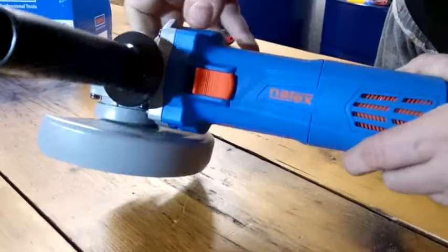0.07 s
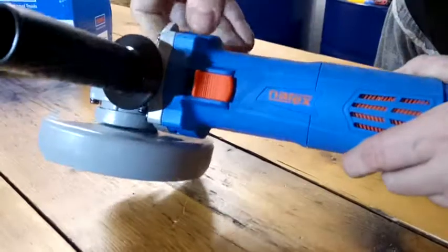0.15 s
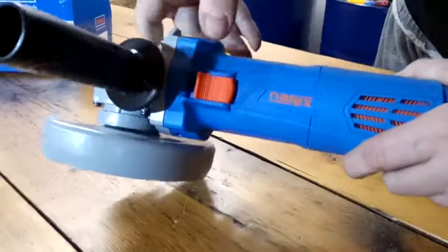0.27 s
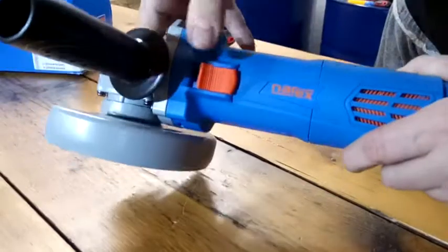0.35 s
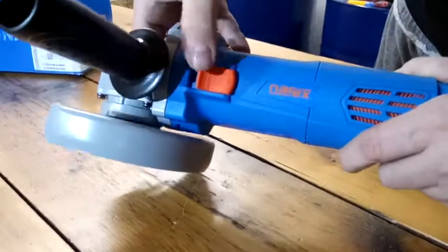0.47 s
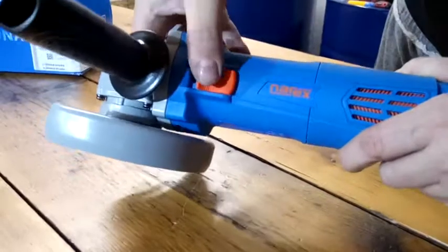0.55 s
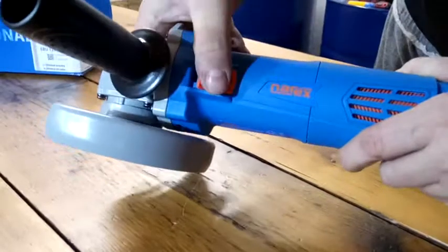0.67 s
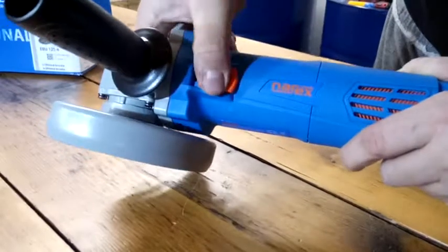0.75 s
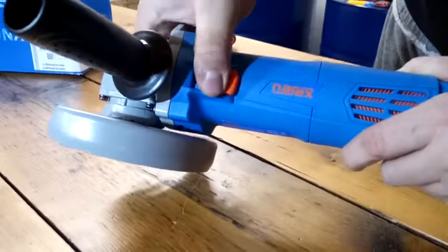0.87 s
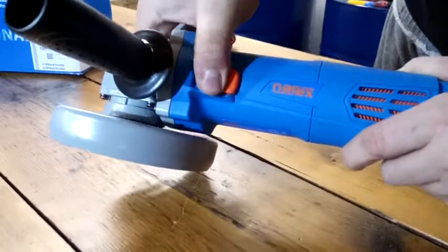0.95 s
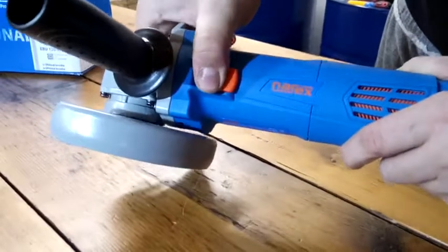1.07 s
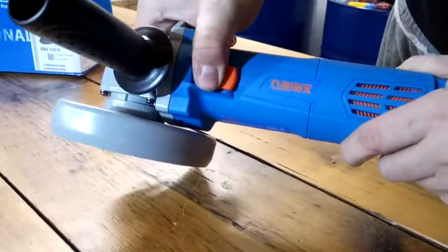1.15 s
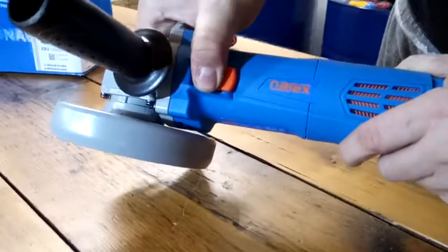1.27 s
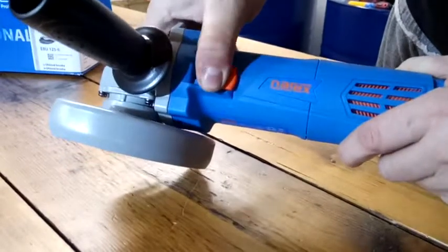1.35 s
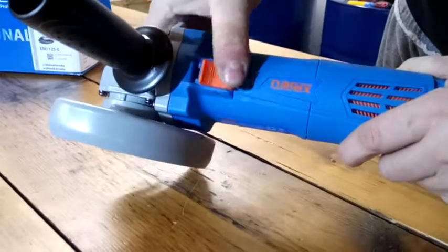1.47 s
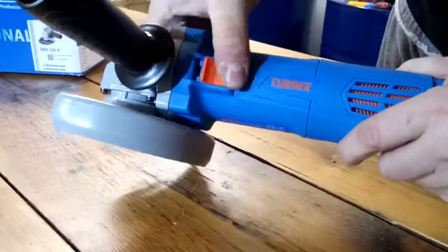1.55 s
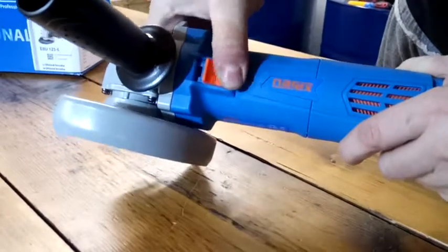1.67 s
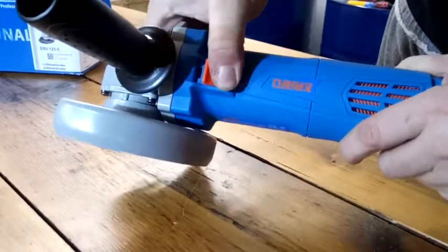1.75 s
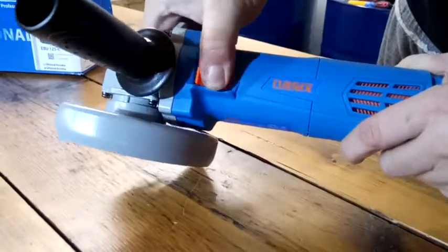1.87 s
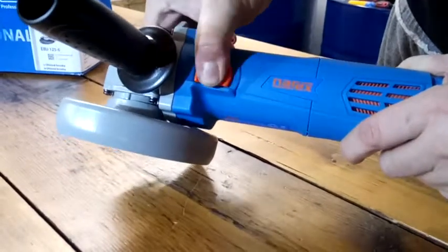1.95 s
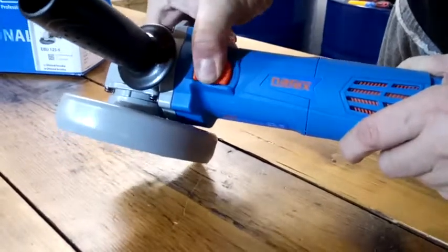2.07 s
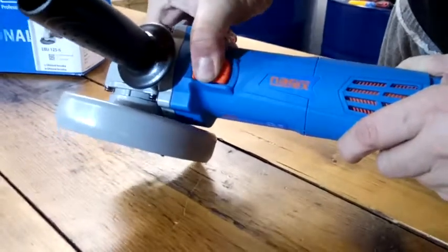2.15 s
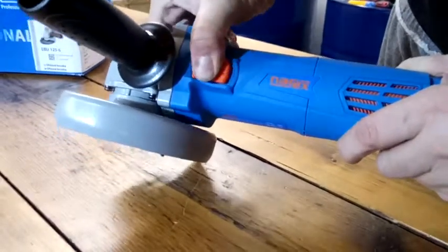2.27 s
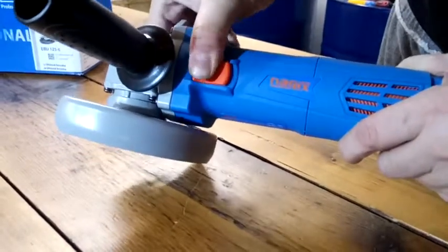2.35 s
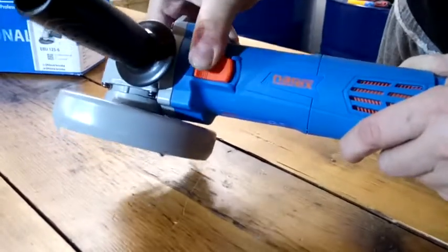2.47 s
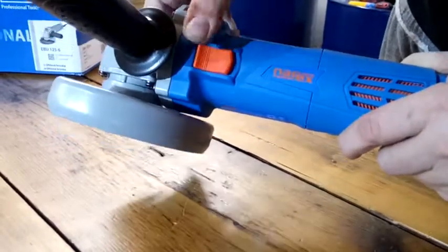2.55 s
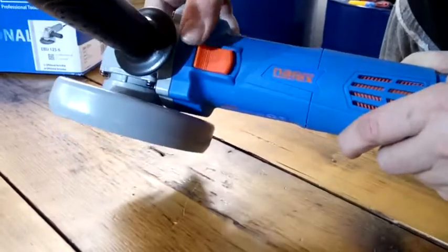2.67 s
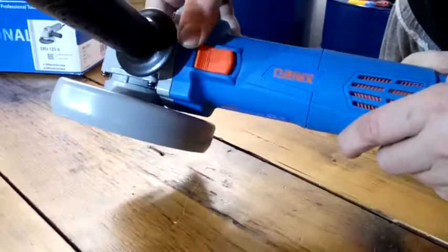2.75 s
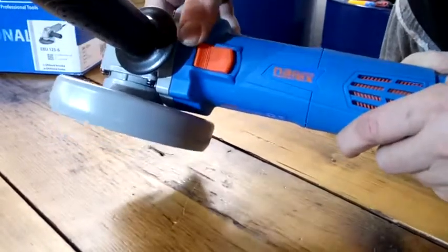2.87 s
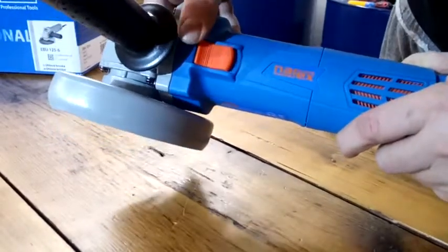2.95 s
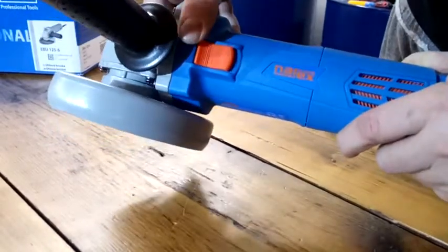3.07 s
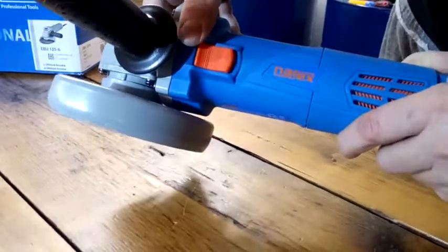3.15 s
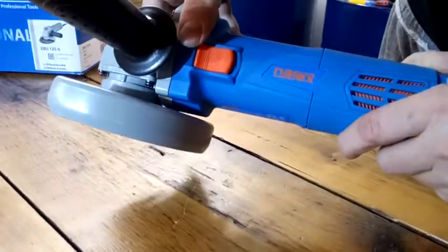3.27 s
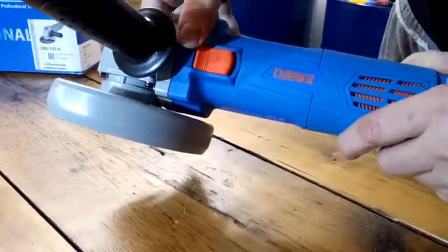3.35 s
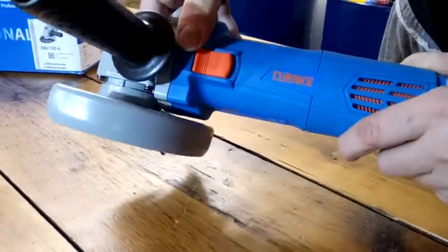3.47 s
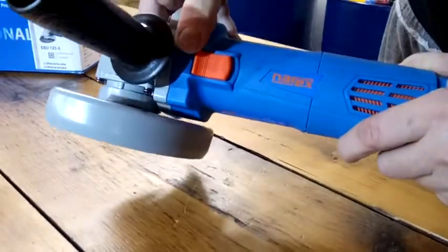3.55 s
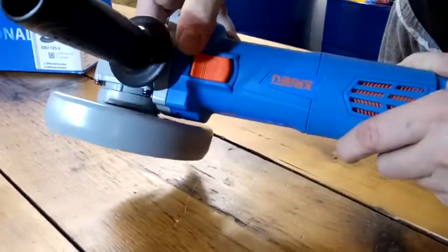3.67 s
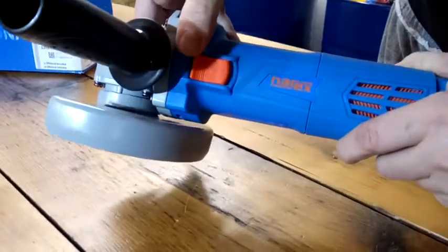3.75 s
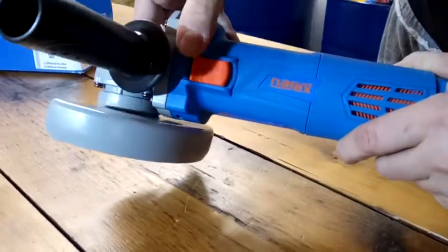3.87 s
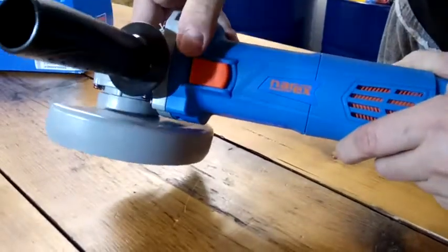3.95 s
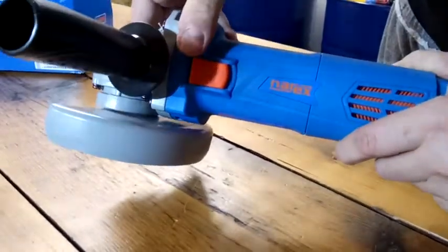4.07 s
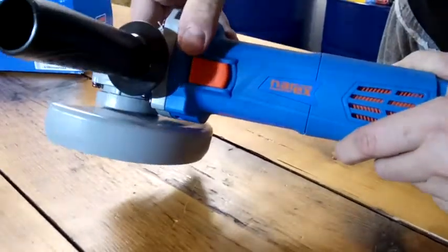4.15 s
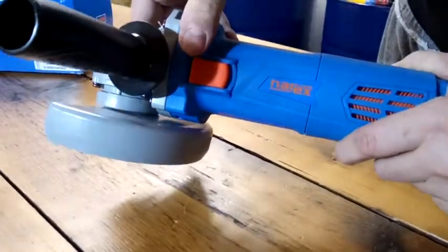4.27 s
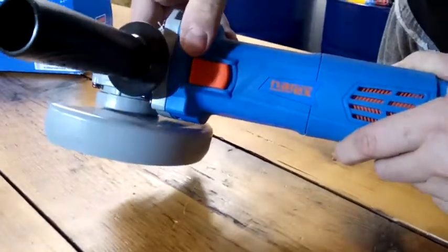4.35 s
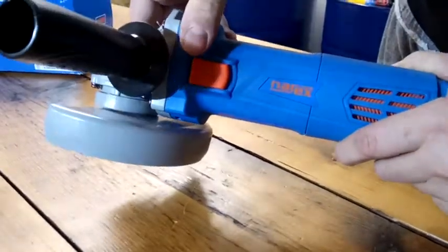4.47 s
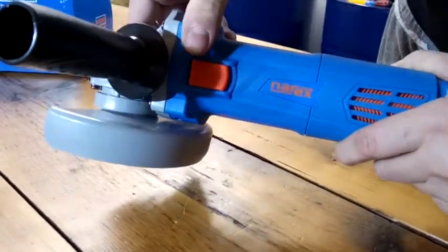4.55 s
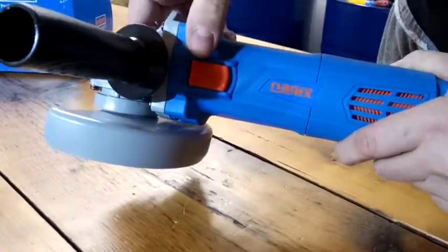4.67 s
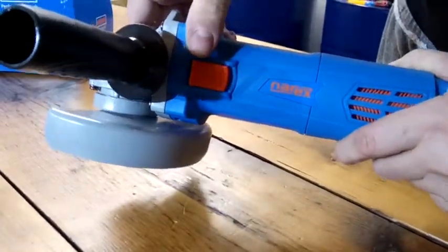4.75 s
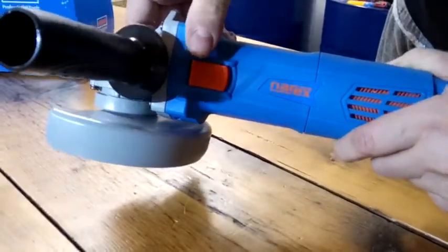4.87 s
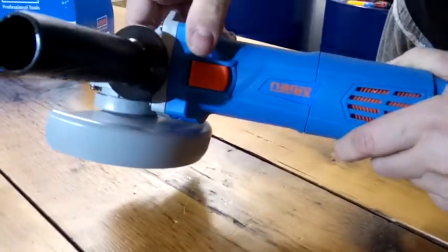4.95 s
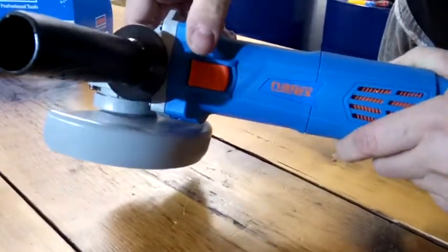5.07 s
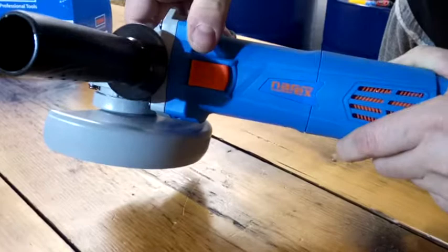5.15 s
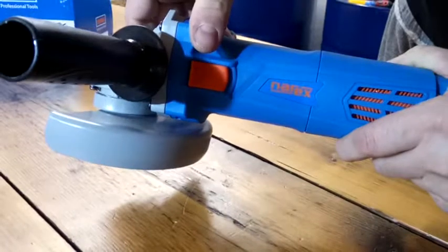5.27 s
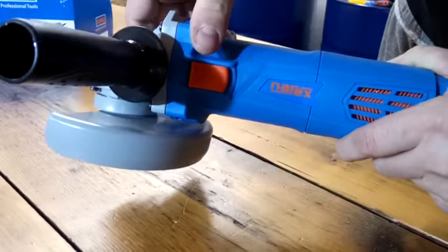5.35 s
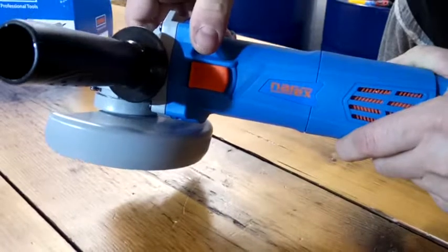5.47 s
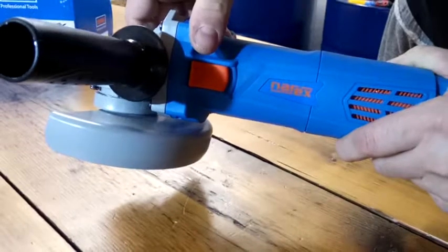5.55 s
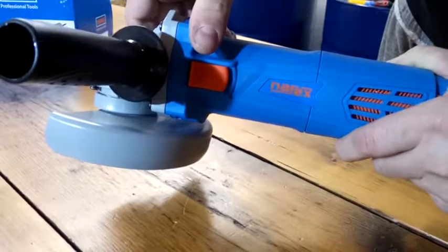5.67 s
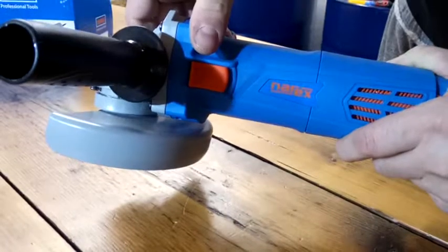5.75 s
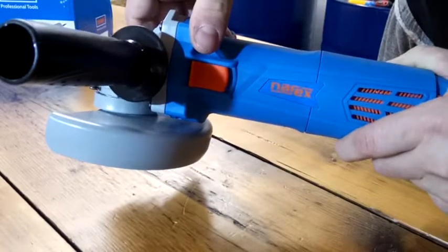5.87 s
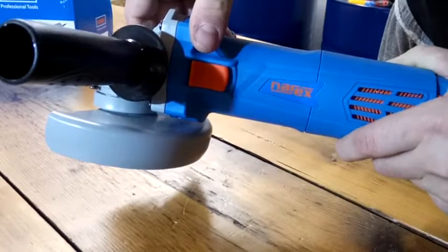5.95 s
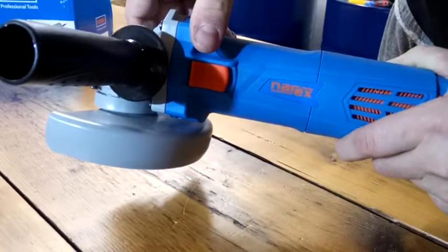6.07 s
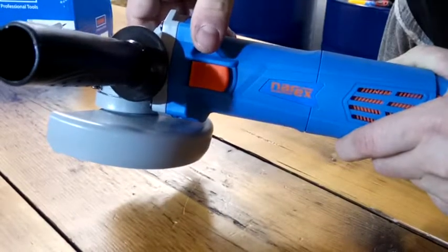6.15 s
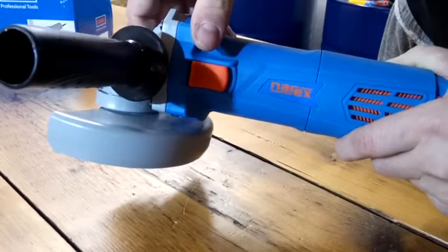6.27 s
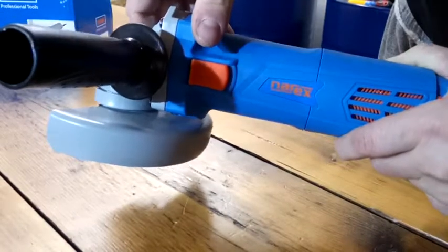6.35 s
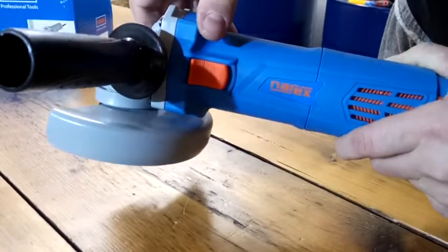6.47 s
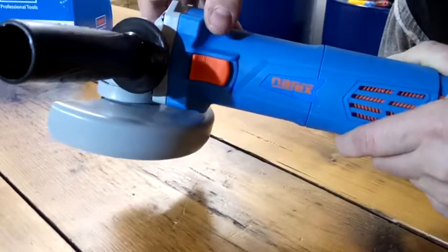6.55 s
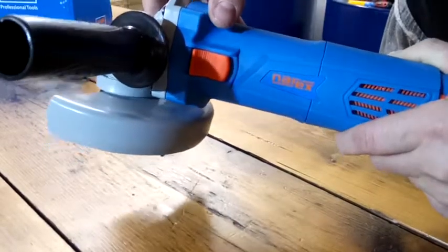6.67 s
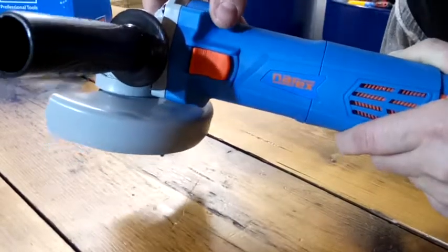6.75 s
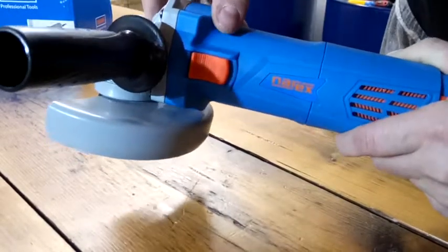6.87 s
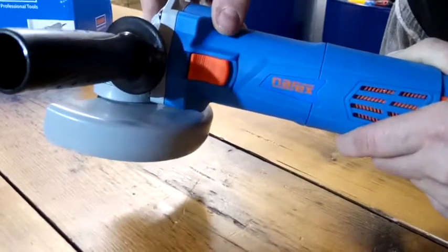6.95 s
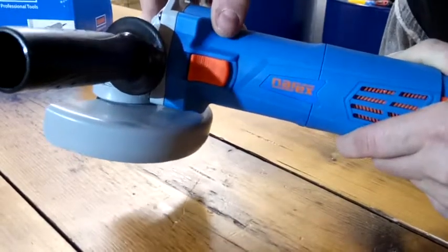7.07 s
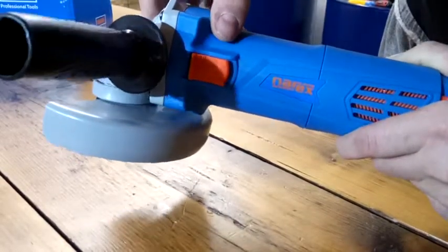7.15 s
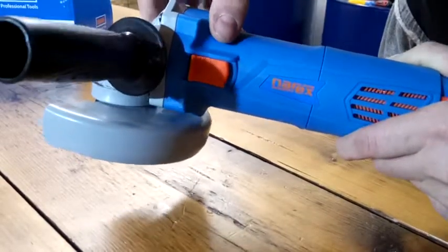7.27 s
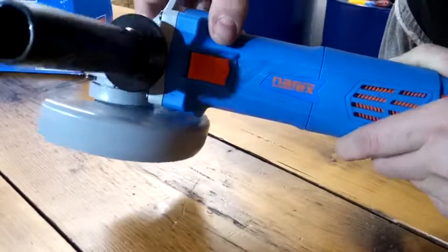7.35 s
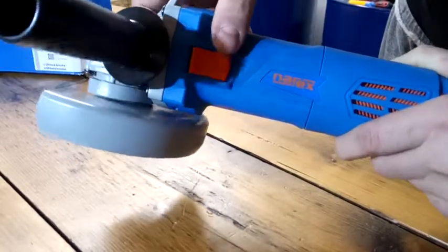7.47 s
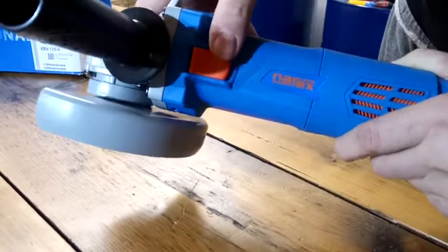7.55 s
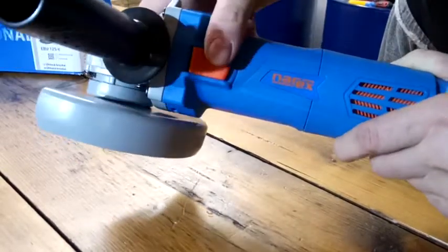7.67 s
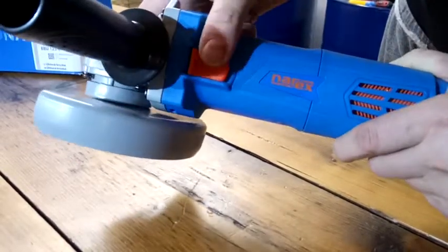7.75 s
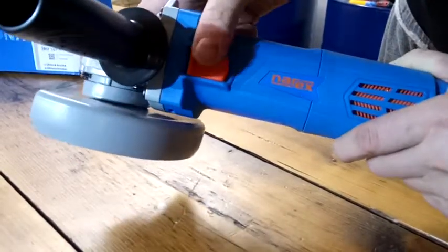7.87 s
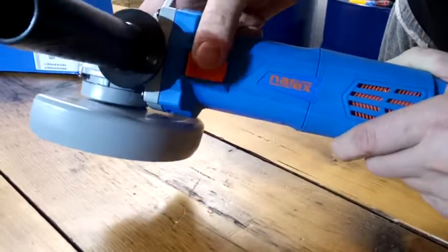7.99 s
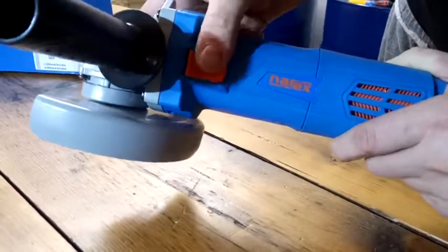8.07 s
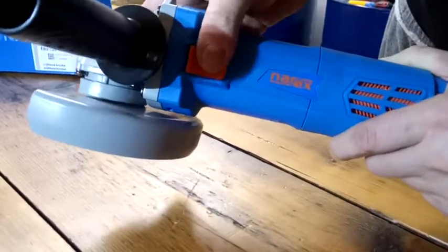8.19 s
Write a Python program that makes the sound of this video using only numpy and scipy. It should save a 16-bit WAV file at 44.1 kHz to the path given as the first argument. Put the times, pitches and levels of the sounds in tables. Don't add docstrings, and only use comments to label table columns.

```python
import sys
import numpy as np
from scipy import signal
from scipy.fft import rfft, irfft, next_fast_len
from scipy.io import wavfile
from scipy.ndimage import uniform_filter1d, map_coordinates

SR = 44100
rng = np.random.default_rng(int(sys.argv[2]) if len(sys.argv) > 2 else 0)


def master(y):
    cut = np.clip(np.atleast_2d(y).T, -1, 1)
    pcm = np.round(cut * 32767)
    wavfile.write(sys.argv[1], SR, pcm.astype(np.int16))


def ratio_of_db(decibels):
    return 10 ** (np.asarray(decibels, float) / 20)


N = 362502
MAINS_HZ = 50
CURRENT_ON_S, STANDSTILL_S = 1.595, 0.8


def seconds():
    return np.arange(N) / SR


def unit(x):
    return x / np.sqrt(np.mean(x ** 2) + 1e-20)


def steady(x, span=4410):
    return x / np.sqrt(np.abs(uniform_filter1d(x ** 2, size=span)) + 1e-12)


def along(points, hz):
    f, v = np.transpose(points)
    return np.interp(np.log(hz + 1), np.log(f + 1), v)


def curves(rows):
    s, *cols = np.transpose(rows)
    return [np.interp(seconds(), s, c) for c in cols]


def gate(start_s, rise_s, end_s, fall_s):
    corners_s = [start_s, start_s + rise_s, end_s, end_s + fall_s]
    return np.interp(seconds(), corners_s, [-60, 0, 0, -60], -200, -200)


def wobble(rate_hz):
    knots = rng.standard_normal(int(N * rate_hz / SR) + 4)
    return map_coordinates(knots, [np.arange(N) * rate_hz / SR])


def filtered(x, response):
    m = next_fast_len(N + SR // 2)
    return irfft(rfft(x, m) * response(np.fft.rfftfreq(m, 1 / SR)), m)[..., :N]


def noise(spectrum):
    return unit(filtered(rng.standard_normal(N), lambda hz: ratio_of_db(along(spectrum, hz))))


def resonance(centre_hz, width_hz, db, f):
    return ratio_of_db(db) * 1j * f * width_hz / (centre_hz ** 2 - f * f + 1j * f * width_hz)


def ringing(modes, f):
    return sum(resonance(*mode, f) for mode in modes)


def dying(t60s):
    hz, t, z = signal.stft(rng.standard_normal(SR // 2), SR, nperseg=256)
    fade = ratio_of_db(-60 * t / along(t60s, hz)[:, None])
    tail = signal.istft(z * fade, SR, nperseg=256)[1][:SR // 2]
    return tail / np.linalg.norm(tail)


def bursts(count, scatter_db, decay_s):
    hit = np.diff(np.floor(count), prepend=np.floor(count[0])) > 0
    size = ratio_of_db(scatter_db * rng.standard_normal(int(np.abs(count).max()) + 2))
    t = np.arange(SR // 40) / SR
    impact = np.exp(-t / decay_s) * (1 - np.exp(-t / 0.0002))
    return signal.fftconvolve(hit * size[np.abs(count).astype(int)], impact)[:N]


def strikes(rows, spectrum, t60_s=None):
    x, t = np.zeros(N + SR), np.arange(SR // 20) / SR
    for s, db, *own_t60 in rows:
        t60 = own_t60[0] if own_t60 else t60_s
        crack = ratio_of_db(db - 60 * t / t60) * (1 - np.exp(-t / 0.0006))
        x[round(s * SR):][:len(t)] += crack * rng.standard_normal(len(t))
    grid_hz = np.linspace(0, SR / 2, 2000)
    norm = np.sqrt(np.mean(ratio_of_db(along(spectrum, grid_hz)) ** 2))
    return filtered(x[:N], lambda hz: ratio_of_db(along(spectrum, hz)) / norm)


# (time [s], speed [turns/s])
ROTOR_SPEED = [(1.6, 40), (1.88, 208), (2.01, 230), (2.06, 280), (2.12, 349), (2.2, 402), (2.291, 448),
               (2.44, 503), (2.64, 545), (2.93, 565), (3.3, 577), (3.5, 581), (4, 586.3), (4.5, 589),
               (5, 590.4), (6, 591.2), (7, 591.6), (8.22, 593.5)]


def rotor():
    return uniform_filter1d(curves(ROTOR_SPEED)[0], size=SR // 12)


def chopper():
    t = seconds()
    delay_ms = np.maximum(5.6 - 10.5 * (t - CURRENT_ON_S), 1.1)
    kick_share = 0.97 * np.clip(1 - (rotor() - 153) / 365, 0, 1)
    return 2 * MAINS_HZ * (t - delay_ms / 1000), kick_share


def speed_left():
    return np.clip(1 - (seconds() / STANDSTILL_S) ** 2, 1e-3, 1)


def tooth_force(coasting):
    knocks_per_s, loose_share, same_kick = 155, 0.67, 0.3
    t = seconds()
    fired, kick_share = chopper()
    kicks = bursts(fired, scatter_db=1.5, decay_s=0.0015)
    loose_count = np.cumsum(knocks_per_s * speed_left()) / SR + 0.21 * wobble(60)
    loose = bursts(loose_count, scatter_db=1.5, decay_s=0.0012)
    grit_count = np.cumsum(np.full(N, 700 / SR)) + 0.45 * wobble(300)
    grit = bursts(grit_count, scatter_db=-7.5, decay_s=0.0018)
    share = np.clip(np.where(coasting, loose_share * (t < 0.66), kick_share), 0, 1)
    pulse = np.sqrt(share) * steady(np.where(coasting, loose, kicks))
    pulse += np.sqrt(1 - share) * (1.83 + 0.21 * unit(grit))
    same = np.clip(same_kick * share ** 2 * ~coasting, 0, 1)
    again = rng.standard_normal(SR // 100 + 1)[(fired % 1 * (SR // 100)).astype(int)]
    return steady(pulse) * (np.sqrt(1 - same) * rng.standard_normal(N) + np.sqrt(same) * again)


# (time [s], level [dB])
EFFORT = [(1.6, -33.5), (1.67, -23), (1.8, -20), (1.84, -23), (1.97, -17.5), (2.1, -19.5), (2.28, -18),
          (3.26, -16), (4.49, -17), (6.37, -16), (6.98, -17.5), (8.2, -15.5), (8.22, -13.5)]
# (frequency [Hz], density [dB/Hz])
COAST_COLOUR = [(59, -47), (100, -11), (160, -22.5), (386, -31), (562, -11), (745, -17.5), (969, -11.5),
                (2260, -13), (2670, -1), (3740, -7.5), (5150, -10.5), (6330, -9.5), (8880, -42.5),
                (11500, -91), (19500, -120)]
# (frequency [Hz], density [dB/Hz])
KICK_COLOUR = [(240, -14), (400, -12), (546, -6), (606, -17), (717, -4), (795, -14), (1070, -2.5),
               (1600, -12), (2250, -9), (2800, -0.5), (3490, -1.5), (3820, -9), (6500, -1), (8880, -49.5),
               (11500, -82), (19500, -120)]
# (frequency [Hz], density [dB/Hz])
SPEED_COLOUR = [(35, -74.5), (60, -49.5), (125, -36), (190, -25), (420, -18), (650, -12), (1000, -11.5),
                (1630, -5.5), (2040, -10.5), (2600, -2), (4060, -3.5), (5960, 2.5), (6730, -5), (7600, -22),
                (9880, -55.5)]
# (frequency [Hz], width [Hz], level [dB])
GEAR_HEAD = [(2650, 340, -3.5), (3120, 44, 0.5), (3365, 90, 4), (4900, 71, -1.5), (5230, 390, -3.5),
             (6200, 60, -3.5), (6120, 66, -5)]
# (frequency [Hz], width [Hz], level [dB])
GUARD_MODES = [(970, 180, -1), (1850, 370, -8.5), (2655, 120, -10), (3390, 110, -9), (4420, 330, -6),
               (5110, 110, -8.5), (5490, 270, -18.5), (8200, 700, 2.5)]
# (low edge [Hz], high edge [Hz])
PART_BANDS = [
    (2300, 4000),
    (4000, 11000),
    (500, 2300),
    (20, 500),
]
# (first level [dB], fade [dB/s], power of speed left [1])
PART_COASTING = [(-32, 0.5, 2.9), (-28.5, 43.5, .55), (-41, 17, 1.3), (-50.5, 2, 2.5)]
# (kicked [dB], at speed [dB], teeth taking load [dB], tool tilted [dB])
PART_RUNNING = [(-7.5, -5.5, 0, 1), (-4.5, -2, 0.4, -1.2), (-10, -12.5, -8, -1.6), (-22.5, -29, -7, .6)]


def clatter():
    t = seconds()
    coasting = t < 1.2
    force = tooth_force(coasting)
    slow = unit(filtered(force * coasting,
                         lambda hz: ratio_of_db(along(COAST_COLOUR, hz)) * (1 + 2 * ringing(GEAR_HEAD, hz))))
    start = unit(filtered(force, lambda hz: ratio_of_db(along(KICK_COLOUR, hz)) * (1 + 0.77 * ringing(GEAR_HEAD, hz))))
    fast = filtered(force, lambda hz: ratio_of_db(along(SPEED_COLOUR, hz)) * (1 + ringing(GUARD_MODES, hz)))
    blend = np.clip((rotor() - 200) / 300, 0, 1)
    effort_db, = curves(EFFORT)
    tilt = np.clip((t - 6.55) / 1.4, 0, 1)
    load = np.exp(-((t - 1.99) / 0.1) ** 2 / 2)
    current_in = np.clip((t - CURRENT_ON_S) / 0.038, 0, 1)
    left = speed_left()
    out = np.zeros(N)
    for (lo, hi), coast_row, run_row in zip(PART_BANDS, PART_COASTING, PART_RUNNING):
        first_db, fade, power = coast_row
        kick_db, fast_db, load_db, tilt_db = run_row
        band = lambda hz: (hz >= lo) & (hz < hi)
        coast = ratio_of_db(first_db - fade * t) * left ** power * (t < STANDSTILL_S + 0.1)
        run_db = effort_db + (1 - blend) * kick_db + blend * fast_db + load_db * load + tilt_db * tilt
        run = ratio_of_db(run_db) * current_in
        coast_sound = np.sqrt(coasting.mean()) * unit(filtered(slow, band))
        low = np.where(coasting, coast_sound, unit(filtered(start, band)))
        mix = (1 - blend) * low + blend * unit(filtered(fast, band))
        mix /= np.sqrt(np.mean(mix[N // 2:] ** 2))
        unsteady = ratio_of_db(0.27 * wobble(7) + 0.47 * wobble(30) + 0.5 * wobble(2.592))
        out += (coast + run) * unsteady * mix
    return out


# (frequency [Hz], level [dB])
SLOT_LEVEL = [(2100, -79), (2700, -30.5), (3500, -40.5), (4200, -29), (4900, -31.5), (5600, -26),
              (6550, -30.5), (7050, -53)]
# (frequency [Hz], level [dB])
BAR_LEVEL = [(4600, -63), (5000, -40.5), (5350, -33), (5900, -33.5), (6600, -44), (7500, -73)]
# (frequency [Hz], width [Hz], level [dB])
CASTING_WALL = [(3360, 160, 0)]
# (multiple of rotor speed [1], level at full speed [dB])
WEAK_ORDERS = [(.2725, -61.5), (2.667, -48.5), (3.74, -49.5), (4.265, -38.5), (5.075, -36.5), (8, -48),
               (9, -42.5), (10, -43.5), (11, -37.5), (12, -48), (13, -60), (14.07, -70.5)]
# (frequency [Hz], width [Hz], level [dB])
SHELL_MODE = [(545.6, 61, 7.5)]


def whine():
    speed, (fired, kick_share), t = rotor(), chopper(), seconds()
    angle = 2 * np.pi * np.cumsum(speed) / SR
    pull = 1 + 1.5 * kick_share * np.sin(2 * np.pi * fired)

    def tone(order, db, rough, rate_hz):
        level = np.sqrt(2) * ratio_of_db(db + 4.4 * np.minimum(rough, 1) * wobble(rate_hz))
        return level * np.sin(order * angle + rough * wobble(rate_hz))

    looseness = 0.22 + 2.6 * kick_share ** 1.2
    slots = pull * tone(12, along(SLOT_LEVEL, 12 * speed), looseness, 120)
    bars = pull * tone(24, along(BAR_LEVEL, 24 * speed), 1.7, 300)
    bars = filtered(bars, lambda hz: 1 + ringing(GEAR_HEAD, hz))
    loaded = ratio_of_db(-27.5) * np.exp(-((t - 2.14) / 0.09) ** 2 / 2)
    wall = unit(filtered(rng.standard_normal(N), lambda hz: ringing(CASTING_WALL, hz) ** 2))
    mesh = loaded * pull * wall
    settled_db = 60 * np.log10(speed / speed[-1])
    lines = sum(tone(k, db + settled_db, 0.35 + 0.038 * k, 15) for k, db in WEAK_ORDERS)
    swing = (speed / speed[-1]) ** 3.4 * np.abs(1 + ringing(SHELL_MODE, speed))
    imbalance = swing * tone(1, -42, 0.1, 30)
    return (imbalance + slots + bars + mesh + lines) * (t > CURRENT_ON_S)


# (time [s], peak [dB])
KICK_JOLTS = [(1.5954, -18.5), (1.615, -18.5), (1.705, -5.5), (1.8145, -4.5), (1.8696, -9), (1.9119, -8),
              (2.004, -11.5), (2.0411, -14.5)]


def jolts():
    return ratio_of_db(-7.5) * strikes(KICK_JOLTS, KICK_COLOUR, t60_s=0.016)


# (time [s], peak [dB])
BACKLASH_KNOCKS = [(0.1004, -14.5), (0.1696, -16.5), (0.22, -14.5), (0.246, -19), (0.2878, -19.5),
                   (0.3202, -22), (0.3365, -21), (0.3674, -19.5), (0.3954, -29.5), (0.414, -27.5),
                   (0.4399, -24), (0.4613, -34), (0.48, -28), (0.4913, -28.5), (0.5053, -29), (0.5687, -38)]
# (time [s], peak [dB], t60 [s])
GEAR_SETTLING = [(0.734, -30, 0.018), (0.853, -66, 0.016)]
# (frequency [Hz], density [dB/Hz])
DROP_COLOUR = [(180, -77), (300, -45), (964, -9), (2170, -31), (2420, -11), (3370, -7), (3860, -22),
               (8000, -52), (10400, -77), (17600, -120)]


def knocks():
    backlash = ratio_of_db(-6) * strikes(BACKLASH_KNOCKS, COAST_COLOUR, t60_s=0.018)
    return backlash + ratio_of_db(-4) * strikes(GEAR_SETTLING, DROP_COLOUR)


# (frequency [Hz], level [dB], unsteadiness [dB])
HUM_LINES = [(50, -25, 3), (100.5, -6, 1.5), (200, -4.5, 0.5), (308, -8.5, 6.5), (503, -17, 3),
             (700, -20, 3)]


def hum():
    t, lift_s = seconds(), 1.98
    level = ratio_of_db(-38 + gate(CURRENT_ON_S - 0.03, 0.055, lift_s, 0.05))
    return level * sum(ratio_of_db(db + depth_db * wobble(22)) * np.sin(2 * np.pi * hz * t)
                       for hz, db, depth_db in HUM_LINES)


# (time [s], peak [dB], t60 [s])
SWITCH_CLICKS = [
    (1.41, -60, 0.014),
    (1.476, -12.5, 0.017),
    (1.509, -46, 0.012),
]
# (frequency [Hz], density [dB/Hz])
SNAP_COLOUR = [(180, -66), (300, -47), (906, -15.5), (2090, -14), (3790, -4.5), (6140, -4.5), (8880, -20.5),
               (11500, -54), (19500, -120)]
# (frequency [Hz], density [dB/Hz])
SKIN_COLOUR = [(3000, -40.5), (4300, -20), (5200, 0), (6400, -3), (7400, -5.5), (8000, -21), (8800, -21),
               (9500, -60.5)]
# (frequency [Hz], density [dB/Hz])
SLIDE_COLOUR = [(300, -4), (600, 11), (900, -5), (1500, -20), (3400, -17), (4300, -16), (6500, -21),
                (7500, -23), (8800, -41), (9500, -88)]
# (time [s], peak [dB], t60 [s])
FINGERTIPS = [(.898, -54, .012), (1.0195, -42.5, 0.019), (1.2145, -54, 0.011)]


def thumb():
    rub_s, slide_s, slide_end_s = 1.079, 1.49, 1.6
    rub_db = -60.5 - 200 * (seconds() - rub_s) + gate(rub_s - 0.008, 0.008, rub_s + 0.1, 0.05)
    slide_db = -53.5 + gate(slide_s - 0.015, 0.01, slide_end_s, 0.05)
    clicks = ratio_of_db(-4.5) * strikes(SWITCH_CLICKS, SNAP_COLOUR)
    rubs = ratio_of_db(rub_db) * noise(SKIN_COLOUR) + ratio_of_db(slide_db) * noise(SLIDE_COLOUR)
    return clicks + rubs + strikes(FINGERTIPS, KICK_COLOUR)


# (time [s], peak [dB])
HAND_BUMPS = [(0.152, -25), (0.344, -23.5), (0.52, -38.5), (0.904, -24), (1.219, -27.5), (1.502, -37)]
# (frequency [Hz], level [dB], t60 [s])
TABLE_MODES = [(72.6, 2.5, 0.19), (129.6, -4, 0.24), (222.6, -11.5, 0.35), (255, -19, 0.25),
               (322.6, -11.5, 0.34), (550, -29, 1.3), (689, -12.5, 0.3)]
# (frequency [Hz], width [Hz], level [dB])
BOARD_MODES = [(214, 92, -4), (356, 67, -0.5), (567, 47, -11), (704, 59, -9.5), (1070, 62, -10),
               (1440, 140, -14), (2630, 190, -22.5), (3280, 220, -16.5), (5080, 170, -21),
               (6370, 330, -39.5)]
# (frequency [Hz], t60 [s])
BOARD_DECAY = [(200, 0.54), (700, 0.34), (1500, .2), (3000, 0.14), (6000, 0.31)]


def table():
    x, body, t = np.zeros(N + SR), np.zeros(N + SR), np.arange(SR // 2) / SR
    for s, db in HAND_BUMPS:
        for late_s, part_db in [(0, -5), (0.015, -11.5)]:
            ring = sum(ratio_of_db(level + rng.normal(0, 4.1) - 60 * t / (0.59 * t60)) * np.sin(2 * np.pi * hz * t)
                       for hz, level, t60 in TABLE_MODES)
            x[round((s + late_s) * SR):][:len(t)] += ratio_of_db(db + part_db) * ring * (1 - np.exp(-t / 0.002))
        rattle = dying(BOARD_DECAY) * (1 + 3 * np.exp(-t / 0.0024))
        body[round(s * SR):][:len(t)] += ratio_of_db(db + 34.5) * rattle

    def boards(hz):
        modes = sum((-1) ** k * resonance(*mode, hz) for k, mode in enumerate(BOARD_MODES))
        return modes * (hz < 7300)

    return x[:N] + filtered(body[:N], boards)


# (frequency [Hz], t60 [s])
ROOM_DECAY = [(100, 0.36), (1000, 0.36), (4000, 0.46), (8000, 0.38)]


def room(x):
    return signal.fftconvolve(np.pad(x, (300, 0)), dying(ROOM_DECAY))[:N]


# (frequency [Hz], density [dB/Hz])
HUSH_COLOUR = [(25, -6.5), (65, -5), (150, -3.5), (300, -15.5), (600, -24.5), (1500, -27), (3300, -30),
               (4500, -27.5), (6300, -29), (7500, -47), (9000, -74.5)]


def hush():
    return ratio_of_db(-65.5) * noise(HUSH_COLOUR)


def scene():
    gears = clatter()
    hits = jolts() + knocks() + thumb() + table()
    echo = room(ratio_of_db(-10) * hits + ratio_of_db(-20) * gears)
    return (gears + whine() + hits + hum() + echo + hush())[None]


# (frequency [Hz], gain [dB])
MIC_RESPONSE = [(20, -7), (40, -4.5), (70, 1.5), (7000, 0), (7600, -2), (8000, -13.5), (8500, -4),
                (8800, -7), (9100, -7.5)]


def microphone(x):
    return filtered(x, lambda hz: ratio_of_db(along(MIC_RESPONSE, hz)) * (hz < 9170))


def top_cut(x):
    return signal.sosfilt(signal.butter(12, 9030, fs=SR, output="sos"), x)


def record(dry):
    limited = dry / (1 + np.abs(dry / 0.52) ** 4) ** (1 / 4)
    heard = microphone(limited)
    return top_cut(heard)


dry = scene()
out = record(dry)
master(out)
```